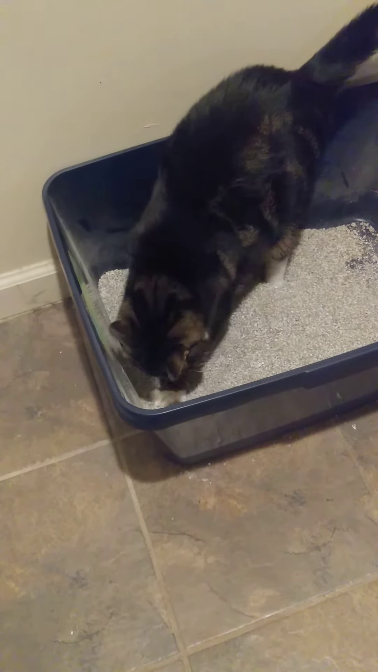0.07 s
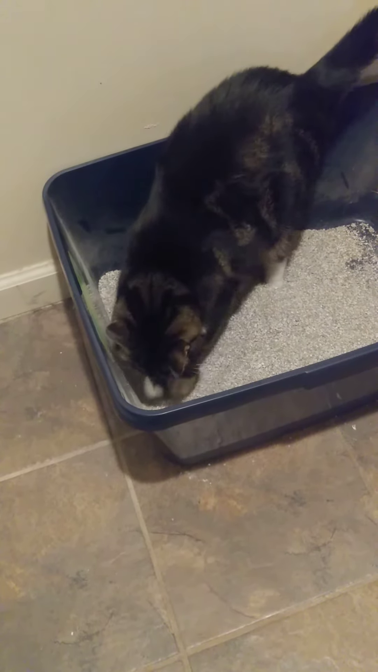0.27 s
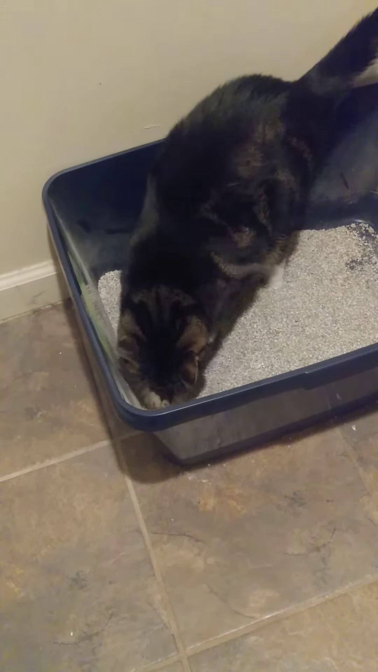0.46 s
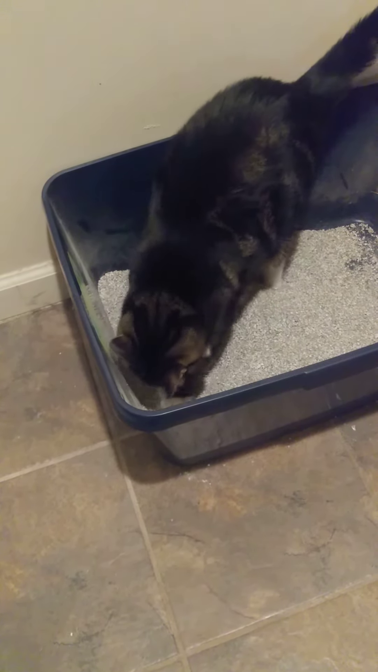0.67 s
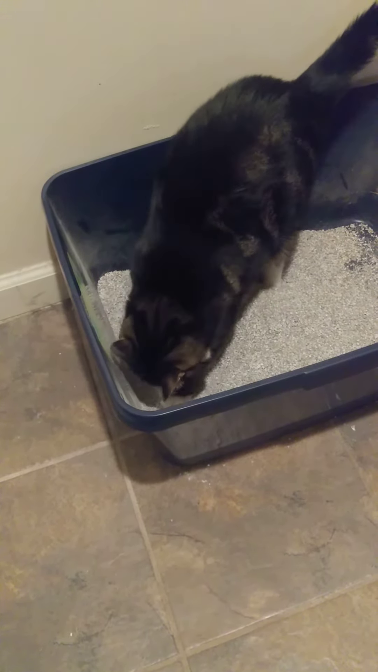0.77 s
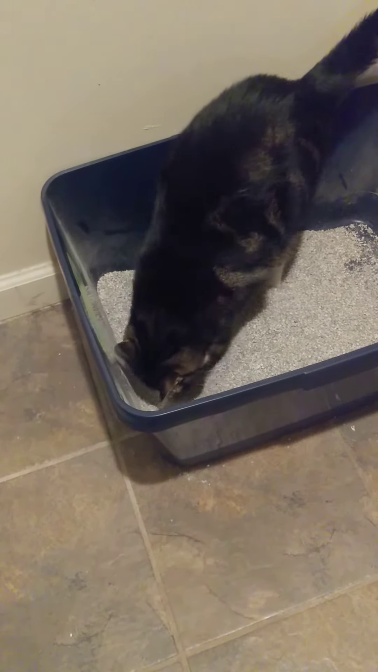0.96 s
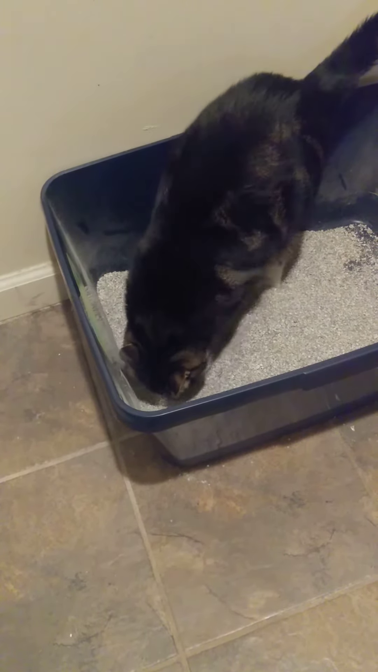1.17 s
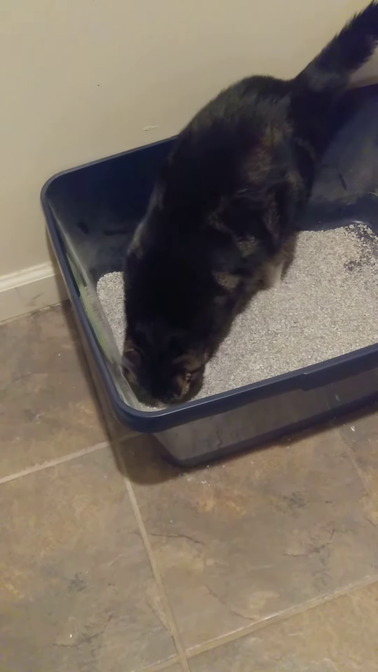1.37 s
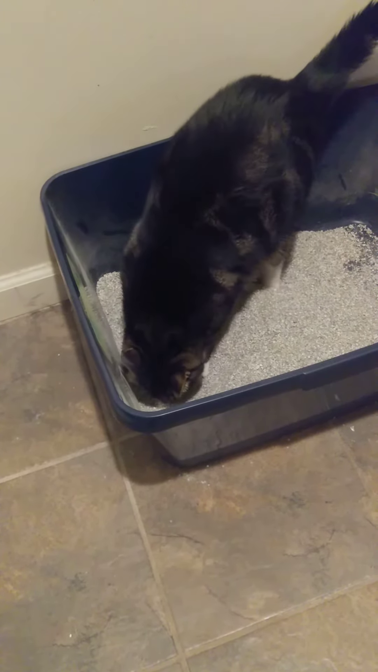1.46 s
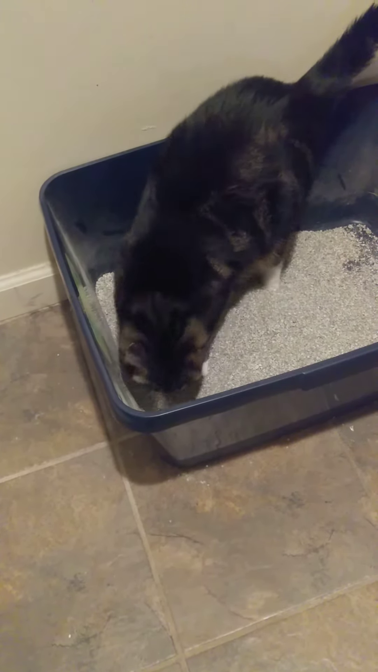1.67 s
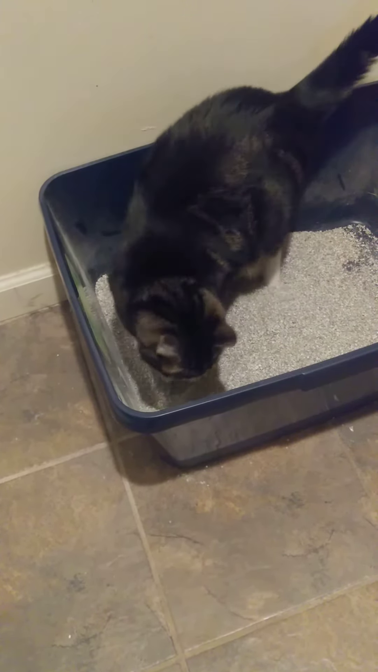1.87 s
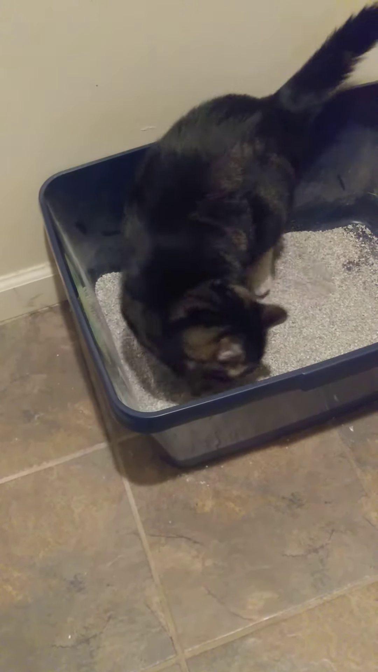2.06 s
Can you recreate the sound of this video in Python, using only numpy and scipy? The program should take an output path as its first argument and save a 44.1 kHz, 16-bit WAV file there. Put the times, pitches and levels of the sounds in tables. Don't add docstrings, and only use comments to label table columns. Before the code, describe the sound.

A cat paws coarse clay litter in a plastic box, close to the microphone: a long crunchy dig, lighter scrapes, then strong rakes, with grains ticking off the wall in a small tiled room over faint hum.

```python
import sys
import numpy as np
from scipy import signal
from scipy.fft import rfft, irfft, next_fast_len
from scipy.io import wavfile
from scipy.ndimage import uniform_filter1d

SR = 44100
rng = np.random.default_rng(int(sys.argv[2]) if len(sys.argv) > 2 else 0)


def bounce(signal):
    frames = np.transpose(np.atleast_2d(signal))
    limited = np.clip(frames, -1, 1)
    pcm = np.round(limited * 32767).astype(np.int16)
    wavfile.write(sys.argv[1], SR, pcm)


def nominal_scale(level):
    x = np.asarray(level, float) / 20
    return 10 ** x


N = 92610

# [t/s, grain flow level/dB, pressure on the box re flow/dB, fineness of the moving grains/dB per octave]
SETTLING_STROKES = [
    [(0.005, -56.5, -25, 0.1), (0.053, -44, -10, 0.1), (0.11, -47, 0, -1.2), (0.149, -52.5, 3, -0.011)],
]
DIG_STROKES = [
    [(.15, -46, 3.5, -5), (.19, -35, -1, -2), (.234, -27, -8, -2.5), (.288, -35, -4, -2),
     (.324, -24.5, -15.5, -3), (.345, -21.5, -16.5, -2.5), (.362, -22, -26, 1.5), (.405, -33, -17, 1),
     (.45, -40, -11, -3.5)],
    [(.508, -46.5, -11, -1.5), (.528, -43.5, 1, -2.5), (.548, -38, 0.5, 0), (.584, -46, 3, -6),
     (.604, -47, 1, -3), (.626, -37.5, 5, -3)],
    [(.634, -33.5, -1, 1), (.65, -30.5, -4, -1.5), (.679, -26, -2, 2), (.695, -27.5, -18, -3.5),
     (.725, -28, -8.5, 1.5), (.759, -40, -16, -1.5), (.782, -38, -2, -3)],
]
RAKE_STROKES = [
    [(.792, -44, 3, -8), (.806, -29.5, -2.5, 1.5), (.826, -24.5, -3, -2), (.848, -22, -9, 0.5),
     (.862, -23, 1, -3), (.882, -20, -5, -0.5), (.918, -25.5, -14, -0.5), (.975, -40.5, -12, -2),
     (1.065, -51, -11, -3.5)],
    [(1.09, -51.5, 4, -4), (1.112, -31.5, -3.5, -1), (1.13, -27, -2, -1.5), (1.155, -27, -10.5, -2),
     (1.19, -29, -16, 4), (1.217, -32, -26, 3.5), (1.232, -28, -24, 6), (1.262, -40.5, -6, 4.5),
     (1.312, -43.5, -22, 3.5)],
    [(1.42, -54.5, -4, -1.5), (1.5, -56.5, 0, -0.5), (1.63, -60.5, 6, -4), (1.72, -57.5, -4, -1)],
    [(1.795, -57.5, -5, -5), (1.807, -34.5, -8.5, -1), (1.833, -31, -9.5, -4.5), (1.87, -39.5, -6.5, -3.5),
     (1.92, -47, -6, -6.5), (1.99, -53.5, -9, -1.5), (2.1, -57.5, -9, 0)],
]
# [start t/s, end t/s, from f/Hz, to f/Hz, level/dB]
FURROW_GLIDES = [
    (.2, 0.274, 645, 890, 6.5),
    (0.29, 0.356, 1940, 1610, 5.5),
    (0.356, 0.446, 3360, 5700, 8.5),
    (0.63, 0.73, 815, 3700, 4),
    (0.787, 0.864, 720, 2270, 6),
    (0.87, .93, 1600, 4200, -2),
    (1.1, 1.16, 1500, 2200, 1),
    (1.81, 1.865, 3500, 1000, 0),
]
# [f/Hz, level/dB]
GRAIN_COLOUR = [(1100, -24), (2000, -4), (3200, -2.5), (5000, -2), (7800, -3.5), (10500, -2.5),
                (12500, -24), (15500, -8)]
# [f/Hz, level/dB, t60/s]
BOX_MODES = [(214, -3.5, 0.028), (336, -7, 0.072), (525, -2.5, 0.076), (636, 0.5, 0.083), (711, 0, 0.05),
             (802, -17, 0.3), (848, 3, 0.017), (953, -6.5, 0.17), (1009, 0, 0.082), (1100, -3.5, 0.0057)]
# [f/Hz, level/dB, t60/s]
WALL_MODES = [(1273, 6, 0.029), (1402, 3, 0.029), (1592, 3.5, 0.012), (1813, 1, 0.075), (1918, -1, 0.022),
              (2028, 4.5, 0.0091), (2227, 4, 0.029), (2857, 0, 0.012), (3270, -6.5, 0.067),
              (3466, 2.5, 0.096), (4080, -4.5, 0.033), (5875, 0.5, 0.09)]
# [t/s, peak level/dB, dull body share/dB]
GRAIN_TICKS = [(.0062, -46, -33), (.0127, -30, -25), (.0218, -32, -34), (.0243, -21.5, -16),
               (.0259, -22, -15), (.0289, -24, -5), (.0345, -26, -12), (.0531, -21.5, -14.5),
               (.0555, -36, -5), (.1045, -43, -16), (.3035, -22, -3), (.3165, -22, -11), (.3213, -24, -23),
               (.338, -22, -20), (.3463, -22, -16), (.3622, -23, -14), (.381, -29, -25), (.415, -23, -8),
               (.5975, -40, -20), (.6062, -22, -21), (.6073, -34, -16), (.6158, -25, -16),
               (0.8764, -15, -9), (1.1133, -32, -15), (1.138, -26.5, 5), (1.151, -40, -21),
               (1.2357, -18, -16), (1.3545, -36, -15), (1.4465, -36, -23), (1.4912, -35, -17),
               (1.6405, -33, -16), (1.659, -40, -30), (1.6995, -47, -5), (1.7385, -38, -13),
               (1.7577, -38, -18), (1.8105, -32, -1), (1.8225, -36, -3), (1.848, -34, 2), (1.962, -31, -18),
               (2.0, -58.5, -17), (2.033, -40, -10),
               (.63122, -9, -39),
    (.8608, -19, -10),
    (.8727, -19, -10),
    (.8842, -18, -14),
    (1.2307, -13, -18),
    (1.8335, -23, -12),
]
# [f/Hz, level/dB, t60/s]
KNOCK_MODES = [(1930, -14.5, 0.029), (2240, -2, 0.015), (2930, -4, 0.0075), (4280, -3.5, 0.011)]
# [f/Hz, rms level/dB, width/Hz]
HUM_LINES = [(113, -78, 5), (165.5, -67.5, 23), (237.7, -47.5, 1.12), (255.3, -59, 1.3), (293.6, -56, 18),
             (356.8, -57, 10.2), (429, -76.5, 9), (822, -69.5, 5.1), (1007, -73, 2.5), (1110, -66, 0.95),
             (1140, -81.5, 2.3), (1490, -96, 2), (2160, -75, 4), (2730, -71, 3.6), (3140, -85, 4.8)]
# [f/Hz, level/dB]
AIR_COLOUR = [(41, -63), (70, -28), (181, -9), (237, -1.5), (417, -7.5), (1900, -26), (2660, -25),
              (8000, -41), (15500, -31)]


def grains(flow_db, fineness):
    grains_per_s, spread_db, cycles, clump_db = 24000, 2, 23, 1.64
    sizes = 24
    hits = clicks(grains_per_s, spread_db) * nominal_scale(clump_db * drift(25))
    dealt = rng.integers(0, sizes, N)
    out = 0
    for k, hz in enumerate(np.geomspace(1200, 15500, sizes)):
        one = rms_one(ring(hits * (dealt == k), hz, cycles / hz)) * np.sqrt(hz / 5000)
        colour_db = at_hz(GRAIN_COLOUR, hz) - 13.5 + furrow(hz)
        tilt_db = fineness * min(np.log2(hz / 3500), 1.2)
        out = out + one * nominal_scale(colour_db + flow_db + 0.34 * drift(20) + tilt_db)
    return out


def furrow(hz):
    width_octaves = 0.41
    t = np.arange(0, N, 64) / SR
    lift_db = 0
    for start, end, from_hz, to_hz, db in FURROW_GLIDES:
        along = np.clip((t - start) / (end - start), 0, 1)
        centre = from_hz * (to_hz / from_hz) ** along
        hump = np.exp(-.5 * (np.log2(hz / centre) / width_octaves) ** 2)
        lift_db = lift_db + db * np.sin(np.pi * along) * hump
    return np.interp(np.arange(N) / SR, t, lift_db)


def trickle(flow_db):
    level_db, fall_db_per_s, band_hz = -12, 116, (2770, 7040)
    slope = fall_db_per_s * np.arange(N) / SR
    held_db = uniform_filter1d(np.maximum.accumulate(flow_db + slope) - slope, size=1500)
    sliding = signal.sosfilt(signal.butter(2, band_hz, "band", fs=SR, output="sos"), clicks(6000, 1.2))
    return nominal_scale(level_db + held_db) * rms_one(sliding)


def plastic(modes, drive_db):
    scrapes_per_s, flutter_db = 2500, 1.75
    scale = np.sqrt(sum(nominal_scale(db) ** 2 for _, db, _ in modes))
    out = 0
    for hz, db, t60 in modes:
        feed_db = drive_db + furrow(hz) + flutter_db * drift(6.1)
        drive = nominal_scale(feed_db) * clicks(scrapes_per_s, 4.03)
        even = np.sqrt(28 / (max(t60, 1e-3) * SR))
        out = out + nominal_scale(db) / scale * ring(drive, hz, t60) * even
    return out


def ticks():
    tick_db, crack_hz = 8, (3900, 12000)
    scatter_db, scatter_s = -21, 0.002
    rim_hz, rim_db, rim_t60_s, rim_lag_s, rim_needs_db = 6000, -22, .014, .0006, -4
    s, db, dull_db = np.transpose(GRAIN_TICKS)
    at = (s * SR).astype(int)
    spread = rng.normal(0, 0.86, (len(s), 4))
    snap = np.zeros(N)
    snap[at] = nominal_scale(db + tick_db)
    decay = [1, -np.exp(-1 / (scatter_s * SR))]
    scatter = signal.lfilter([nominal_scale(scatter_db)], decay, np.roll(snap, 8) + 1e-18)
    crack = signal.butter(2, crack_hz, "band", fs=SR, output="sos")
    out = signal.sosfilt(crack, snap + scatter * rng.standard_normal(N))
    hard = snap * (snap > nominal_scale(rim_needs_db))
    out += nominal_scale(rim_db) * ring(np.roll(hard, int(rim_lag_s * SR)), rim_hz, rim_t60_s)
    for k, (hz, level_db, t60) in enumerate(KNOCK_MODES):
        hit = np.zeros(N)
        hit[at] = nominal_scale(db + level_db + spread[:, k] + dull_db)
        out += ring(hit, hz, t60)
    return out


def room(x):
    t60_s, wall_cut_hz = 0.16, 8300
    size = next_fast_len(N + SR)
    w = 2 * np.pi * np.fft.rfftfreq(size)
    dull = 1 / (1 + 1j * w * SR / (2 * np.pi * wall_cut_hz))
    tail = 0
    for k, lag in enumerate(rng.uniform(.004, .03, 10) * SR):
        loop = nominal_scale(-60 * lag / SR / t60_s) * np.abs(dull) ** 0.76 * np.exp(-1j * w * lag)
        tail = tail + (-1) ** k * loop / (1 - loop)
    return irfft(rfft(x, size) * tail, size)[:N]


def hum():
    t = np.arange(N) / SR
    out = 0
    for hz, db, width in HUM_LINES:
        level = np.sqrt(2) * nominal_scale(db + 1.4 * drift(width))
        out = out + level * np.sin(2 * np.pi * (hz * t + rng.random()) + 0.62 * drift(width))
    return out


def room_air():
    air_db, rumble_db, rumble_hz = -51, -73, (50, 73.4)
    hz = np.maximum(np.fft.rfftfreq(N, 1 / SR), 1)
    colour = nominal_scale(at_hz(AIR_COLOUR, hz)) * np.minimum(hz / 70, 1) ** 3
    air = irfft(rfft(rng.standard_normal(N)) * colour, N)
    band = signal.butter(1, rumble_hz, "band", fs=SR, output="sos")
    rumble = signal.sosfilt(band, rng.standard_normal(N + SR))[SR:]
    rumble = signal.sosfilt(band, rumble)
    return nominal_scale(air_db) * rms_one(air) + nominal_scale(rumble_db) * rms_one(rumble)


def clicks(per_s, spread_db):
    sizes = nominal_scale(spread_db * np.minimum(rng.exponential(1, N), 4)) * rng.choice([-1, 1], N)
    return rms_one(sizes * (rng.random(N) < per_s / SR))


def ring(hits, hz, t60):
    r = nominal_scale(-60 / (max(t60, 1e-4) * SR))
    w = 2 * np.pi * hz / SR
    return signal.lfilter([0, np.sin(w)], [1, -2 * r * np.cos(w), r * r], hits + 1e-18)


def drift(rate):
    step = 40
    r = np.exp(-2 * np.pi * rate * step / SR)
    slow = signal.lfilter([1], [1, -2 * r, r * r], rng.standard_normal(N // step + 2002))[2000:]
    return np.interp(np.arange(N) / step, np.arange(len(slow)), rms_one(slow))


def at_hz(points, hz):
    f, db = np.transpose(points)
    return np.interp(np.log(hz), np.log(f), db)


def rms_one(x):
    return x / np.sqrt(np.mean(x ** 2) + 1e-20)


def scene():
    box_db, wall_db, room_db = -3.5, -8.5, -13
    low_cut_hz, contact_cut_hz = 186, 5400
    s, *columns = np.concatenate(SETTLING_STROKES + DIG_STROKES + RAKE_STROKES).T
    flow_db, press_db, fineness = [np.interp(np.arange(N) / SR, s, c) for c in columns]
    near = grains(flow_db, fineness) + trickle(flow_db) + ticks()
    box = plastic(BOX_MODES, flow_db + press_db + box_db)
    box = box + plastic(WALL_MODES, flow_db - 0.86 * fineness + wall_db)
    soft_contact = signal.butter(2, contact_cut_hz * 2.3, fs=SR, output="sos")
    near = near + signal.sosfilt(soft_contact, box)
    near = signal.sosfilt(signal.butter(6, low_cut_hz, "high", fs=SR, output="sos"), near)
    return (near + nominal_scale(room_db) * room(near) + hum() + room_air())[None]


def top_cut(x):
    return signal.sosfilt(signal.butter(12, 16790, fs=SR, output="sos"), x)


def record(dry):
    peak_hz, peak_db, top_hz, top_db, limit_hz = (8670, 10000), 1, 10100, -9, 15950
    peak = signal.sosfilt(signal.butter(2, peak_hz, "band", fs=SR, output="sos"), dry)
    x = dry + nominal_scale(peak_db) * peak
    below = signal.sosfiltfilt(signal.butter(4, top_hz, fs=SR, output="sos"), x)
    x = below + nominal_scale(top_db) * (x - below)
    x = signal.sosfiltfilt(signal.cheby2(16, 24, limit_hz, fs=SR, output="sos"), x)
    return top_cut(x)


dry = scene()
out = record(dry)
bounce(out)
```